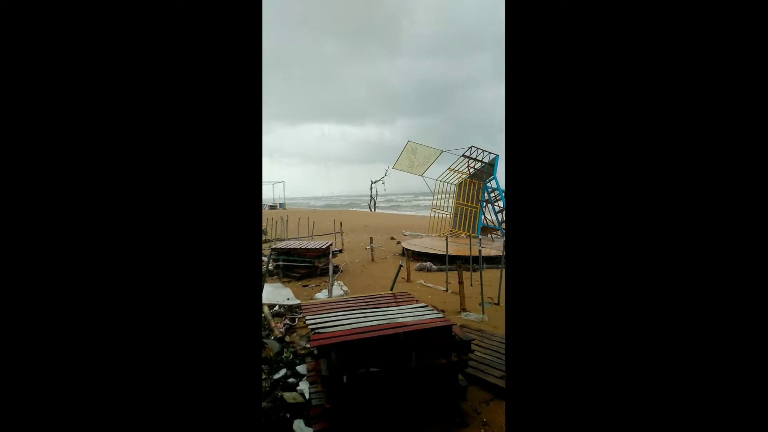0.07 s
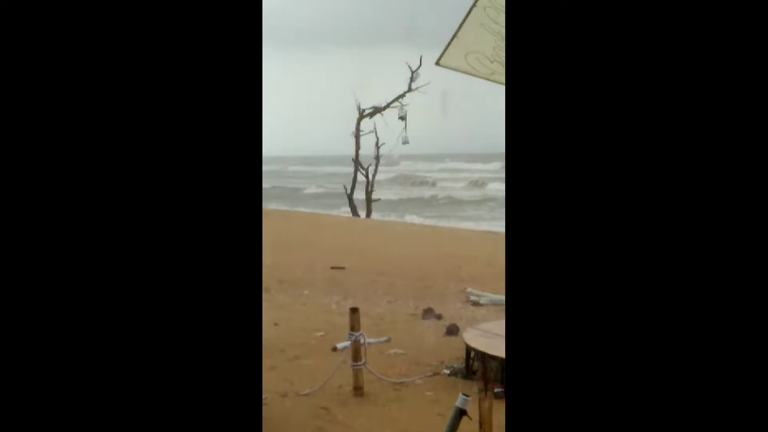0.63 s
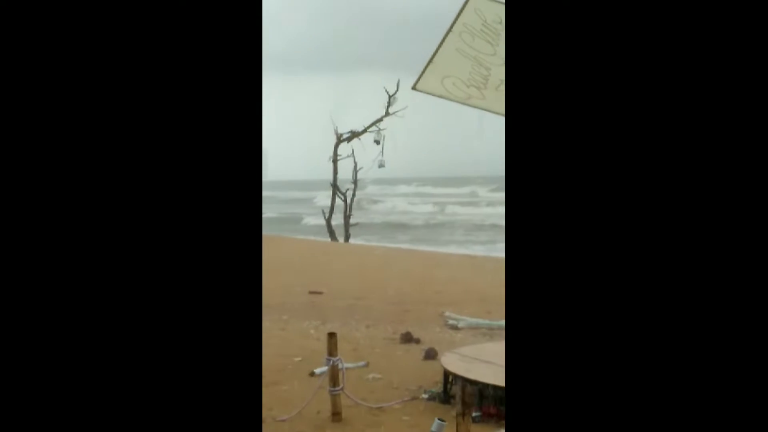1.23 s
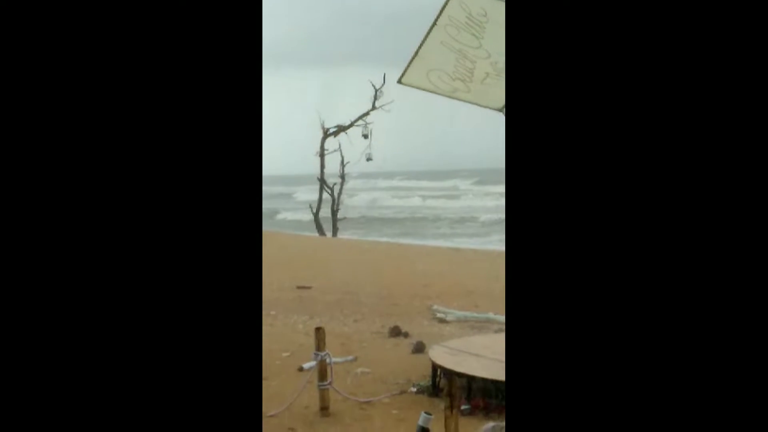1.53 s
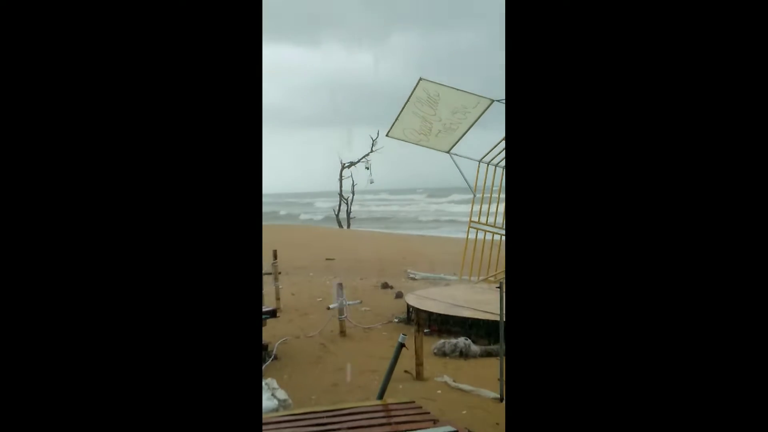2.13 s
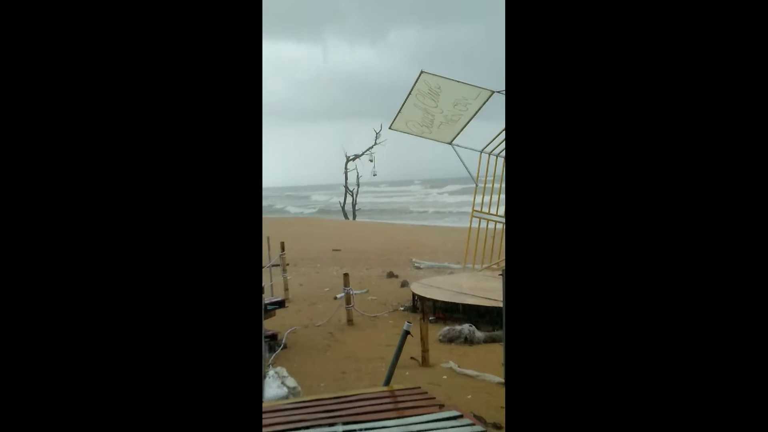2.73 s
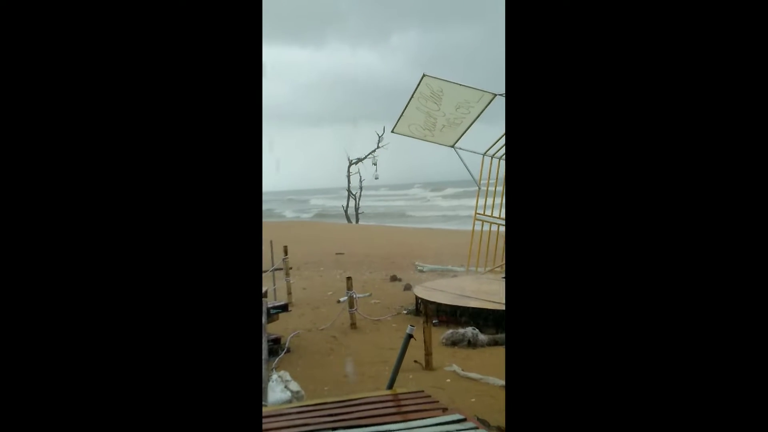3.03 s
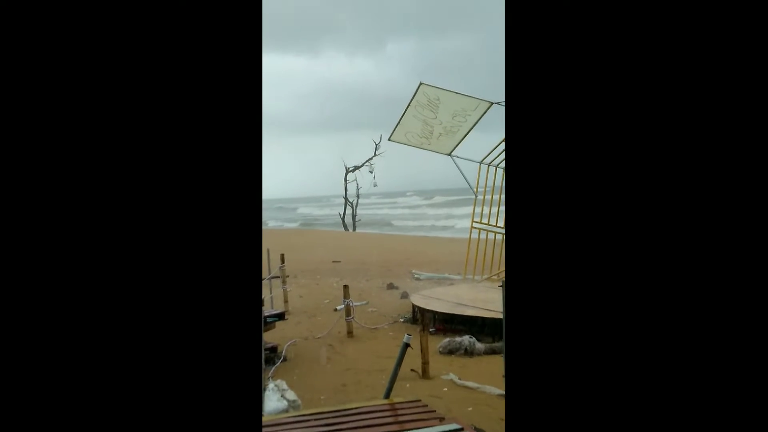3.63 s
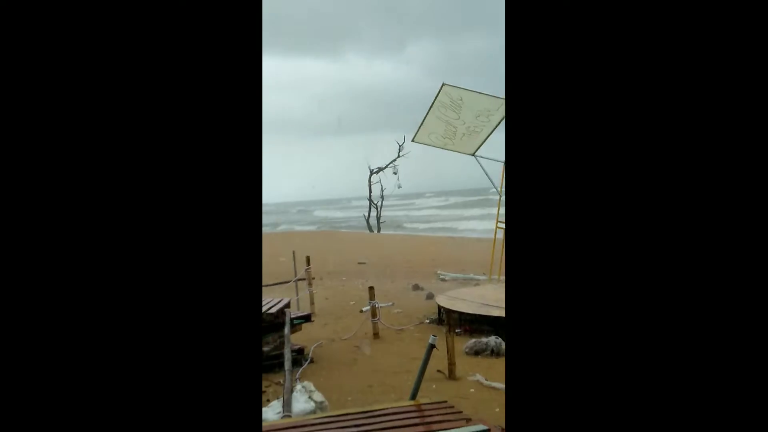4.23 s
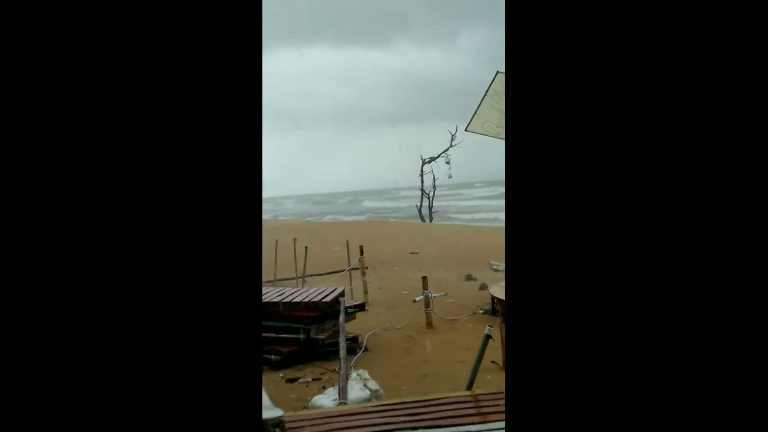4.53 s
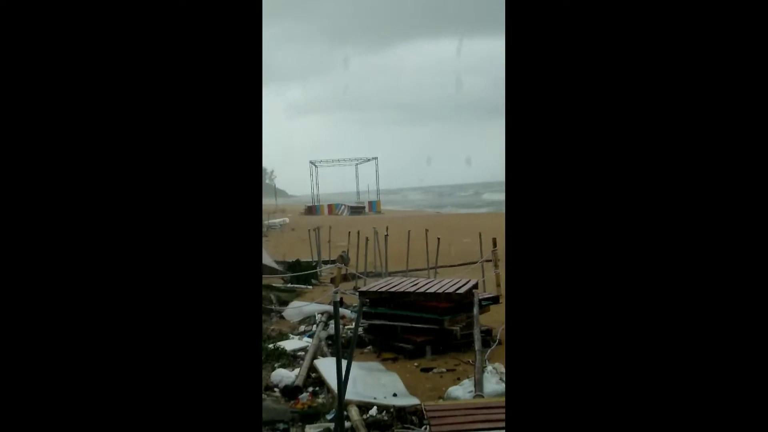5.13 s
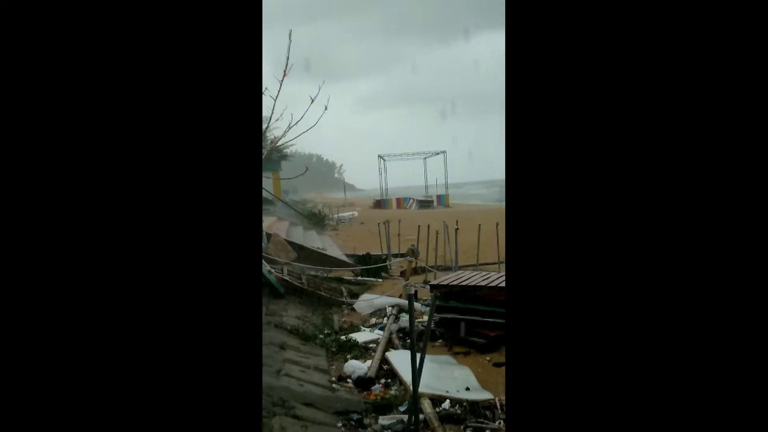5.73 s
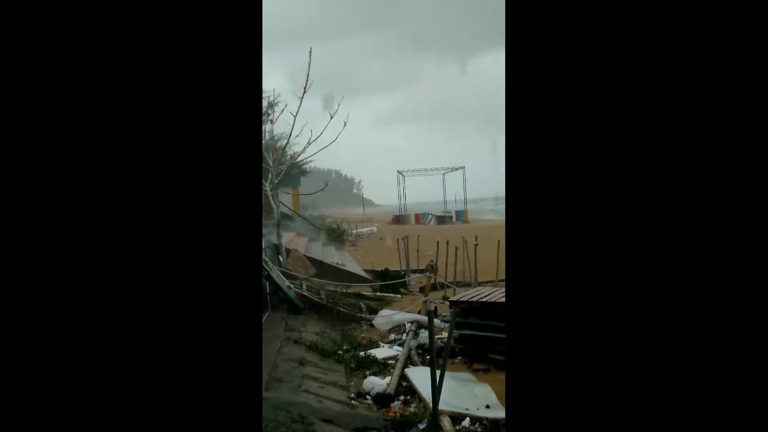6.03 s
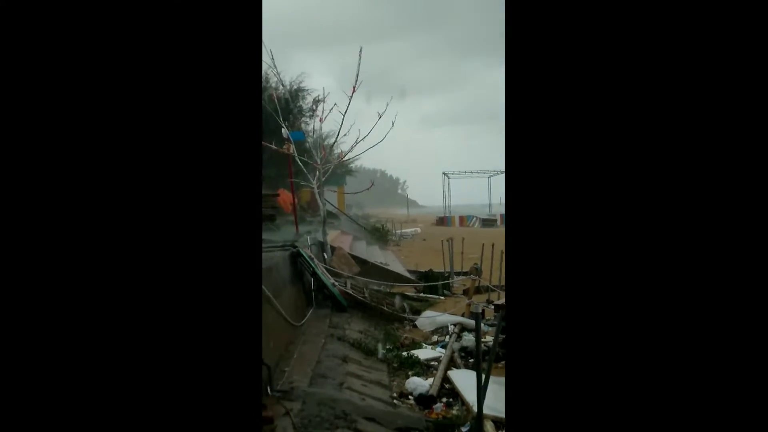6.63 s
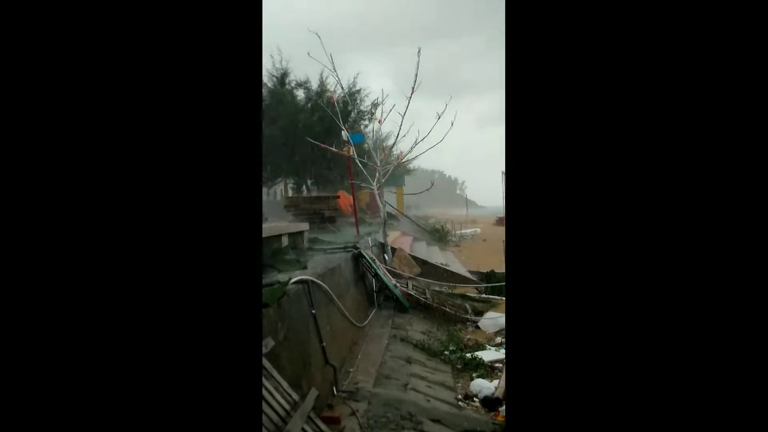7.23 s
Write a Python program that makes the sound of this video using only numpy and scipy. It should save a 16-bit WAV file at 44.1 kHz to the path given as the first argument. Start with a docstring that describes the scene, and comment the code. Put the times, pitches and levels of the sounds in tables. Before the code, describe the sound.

Loud, steady roar of storm wind and surf with hissing torrential rain and a few sharp drops close by.

```python
"""A loud, steady roar over a low rumble: wind and surf in a storm on a sandy beach, heard from a shelter.
Both are turbulent flows, which radiate broadband noise that swells with each gust. Above them
torrential rain hisses, the sum of countless impacts, with a fine patter and now and then a sharp
drop close by. The small microphone is mono, and the roar overloads it on every high crest."""
import sys
import numpy as np
from scipy import signal
from scipy.fft import rfft, irfft
from scipy.io import wavfile
from scipy.ndimage import uniform_filter1d

SR = 44100
rng = np.random.default_rng(int(sys.argv[2]) if len(sys.argv) > 2 else 0)


def pcm_store(signal):
    """Save signal as 16-bit PCM."""
    levels = np.round(np.clip(np.atleast_2d(signal), -1, 1) * 32767)
    wavfile.write(sys.argv[1], SR, levels.astype(np.int16).T)


N = 329427

# Noise spectra of surf and gale, wind round the shelter and far rain: (frequency [Hz], density [dB])
ROAR_SPECTRUM = [(150, -41), (270, -13.5), (430, -6), (600, -5.5), (830, 0.0), (980, -0.55), (1100, -2),
                 (1650, -3), (2040, -5.5), (2180, -4), (2830, -7.5), (3250, -14.5), (4500, -23),
                 (6500, -57)]
RUMBLE_SPECTRUM = [(15, -32), (25, -10), (150, 0.5), (194, 1), (260, -8), (340, -37), (570, -120)]
RAIN_SPECTRUM = [(2800, -42), (4500, -7), (5200, -5.5), (6700, -3.5), (7600, 0), (8100, -1.5), (9300, -8.3),
                 (12700, -13.7), (14200, -11.2), (15400, -7)]
# Close impacts: (time [s], level [dB], centre frequency [Hz], decay time [s])
CLOSE_DROPS = [(.0338, -1, 7700, .0011), (.0414, -4, 7600, .0005), (2.384, -13, 10900, .0005),
               (3.481, -14, 12500, .0006), (3.8255, -12, 8300, .0007), (3.829, -13, 10500, .0006),
               (4.3008, -13, 11000, .0005), (4.6712, -10, 7700, .0006), (5.012, -4, 8300, .0005),
               (5.8383, -10, 8400, .0005), (5.8535, -14, 14500, .004), (6.3815, -3.5, 7700, .0005),
               (6.611, -14, 11500, .0006), (7.0098, -12, 13500, .002)]
# Gusts, negative for a lull: (peak time [s], duration [s], relative strength [dB])
WIND_GUSTS = [(.43, .65, 0.9), (1.25, 1.8, .6), (2.3, 1.15, 1.2), (3.72, .8, -.5), (4.5, 1.1, 0.5),
              (5.92, 1.3, 0.84), (7.35, 0.45, .4)]
# The wind freshens and its rumble stays up: (start [s], end [s], change [dB])
RUMBLE_RISE = (3.4, 3.8, 1.4)
# The rain's hiss eases: (start [s], end [s], change [dB])
HISS_FALL = (2.9, 3.9, -1.4)
# The rain's finest fizz builds, then drops back: (time [s], level [dB])
FIZZ_LEVELS = [(0, -1.5), (2.4, -0.5), (4.3, -0.5), (5.3, -2), (7.47, -2)]


def surf_roar(body_db=-13.0, spray_db=-13.0, body_gust_share=0.75, spray_gust_share=1.15, eddy_db=.1):
    """Turbulence in breakers and gale radiates broadband noise; the bright spray swells most in gusts."""
    body, spray = split(turbulent_noise(ROAR_SPECTRUM, patchy_db=0.2), hz=1300)
    gust_db = gusts()
    body = evened(body) * gain_of(body_db + body_gust_share * gust_db + eddy_db * eddies(2, 6))
    spray = evened(spray) * gain_of(spray_db + spray_gust_share * gust_db + eddy_db * eddies(2.017, 6))
    return body + spray


def rain(level_db=-22.5, wash_db=2.5, patter_db=-14.5, fizz_hz=10000, gust_share=0.7, sheets_db=0.45):
    """Countless far impacts add incoherently to a hiss under the patter; wind drives them in sheets."""
    wash = turbulent_noise(RAIN_SPECTRUM, patchy_db=0.73, size=1024, patch_cells=28)
    hiss, fizz = split(gain_of(wash_db) * wash + gain_of(patter_db) * patter(), fizz_hz)
    fizz_db = np.interp(np.arange(N) / SR, *np.transpose(FIZZ_LEVELS))
    rainfall = hiss * gain_of(ramp(*HISS_FALL)) + fizz * gain_of(fizz_db)
    return rainfall * gain_of(level_db + gust_share * gusts() + sheets_db * eddies(3, 18))


def patter(drops_per_s=260, spread_db=0.5, low_hz=7000, high_hz=15000, decay_s=0.0004, bands=24):
    """Small drops of many pitches land nearby as a Poisson process, a few slightly louder than the rest."""
    out = np.zeros(N)
    for hz in np.geomspace(low_hz, high_hz, bands):
        landings = rng.random(N) < drops_per_s / bands / SR
        strengths = gain_of(spread_db * np.minimum(rng.exponential(1, N), 4))
        out += signal.oaconvolve(landings * strengths, drop_burst(hz, decay_s))[:N]
    return evened(out)


def close_drops(splash_db=-19, splash_decay_s=0.017):
    """Each impact beside the microphone radiates a sharp transient and throws off a faint splash."""
    out = np.zeros(N)
    for start_s, level_db, hz, decay_s in CLOSE_DROPS:
        splash = gain_of(splash_db) * drop_burst(hz, splash_decay_s, width_octaves=.45)
        impact = drop_burst(hz, decay_s)
        add(out, start_s, gain_of(level_db) * (impact + splash))
    return out


def drop_burst(hz, decay_s, width_octaves=0.27, rise_s=0.00016):
    """A bursting drop is an impulsive source: a band of noise around hz that decays exponentially."""
    t = np.arange(4096) / SR
    f = np.fft.rfftfreq(len(t), 1 / SR)
    band = np.exp(-.5 * (np.log2((f + 1) / hz) / width_octaves) ** 2)
    noise = irfft(band * np.exp(2j * np.pi * rng.random(len(f))))
    carrier = np.cos(np.angle(signal.hilbert(noise)))  # phase alone, so the amplitude is even
    envelope = np.exp(-t / decay_s) * (1 - np.exp(-t / rise_s))
    return carrier * envelope / envelope.max()


def wind_rumble(level_db=-29, gust_share=1.8, lead_s=.2, buffet_db=0.6):
    """Flow round the shelter makes low pressure fluctuations, which swell just ahead of each gust's roar."""
    swell_db = ramp(*RUMBLE_RISE) + gust_share * gusts(lead_s) + buffet_db * eddies(1, 8.2)
    return turbulent_noise(RUMBLE_SPECTRUM, patchy_db=0.35) * gain_of(level_db + swell_db)


def gusts(lead_s=0):
    """Flow noise grows with wind speed: each gust is a raised-cosine arch of level in dB."""
    t = np.arange(N) / SR + lead_s
    return sum(db * np.cos(np.pi * np.clip((t - peak_s) / duration_s, -.5, .5)) ** 2
               for peak_s, duration_s, db in WIND_GUSTS)


def eddies(low_hz, high_hz, count=24):
    """Eddies of many rates superpose in random phase to give a fluctuation of unit rms."""
    t = np.arange(N) / SR
    rates_hz = np.geomspace(low_hz, high_hz, count)
    return evened(sum(np.sin(2 * np.pi * (hz * t + rng.random())) for hz in rates_hz))


def turbulent_noise(spectrum, patchy_db, size=2048, patch_cells=20, hop=256):
    """Random sources sum to coloured Gaussian noise, with patches that come and go in time and pitch."""
    hz = np.fft.rfftfreq(size, 1 / SR)
    real, imag, patches = rng.standard_normal((3, N // hop + 9, len(hz)))
    patches = uniform_filter1d(patches, size=patch_cells, axis=0)  # smooth in time
    patches = evened(uniform_filter1d(patches, size=patch_cells, axis=1))  # and in frequency
    frames = (real + 1j * imag) * gain_of(level_at(spectrum, hz) + patchy_db * patches)
    _, noise = signal.istft(frames.T, nperseg=size, noverlap=size - hop)
    return evened(noise[:N])


def level_at(spectrum, hz):
    """Linear interpolation of a spectrum on a log-frequency axis."""
    f, db = np.transpose(spectrum)
    return np.interp(np.log(hz + 1), np.log(f + 1), db)


def ramp(start_s, end_s, change_db):
    """A gradual, lasting change of level in dB."""
    return change_db * np.clip((np.arange(N) / SR - start_s) / (end_s - start_s), 0, 1)


def split(x, hz, order=8):
    """Complementary filters give the parts of x below and above hz."""
    f = np.fft.rfftfreq(N, 1 / SR)
    low = irfft(rfft(x) / (1 + (f / hz) ** (2 * order)), N)
    return low, x - low


def add(mix, start_s, sound):
    """Superposes a sound on the mix."""
    part = mix[max(round(start_s * SR), 0):][:len(sound)]
    part += sound[:len(part)]


def gain_of(db):
    """Decibels to amplitude ratio."""
    return 10 ** (np.asarray(db) / 20)


def evened(x):
    """Scales to an rms of 1."""
    return x / np.sqrt(np.mean(x ** 2) + 1e-20)


def scene():
    """Sound pressures superpose at one microphone, which feeds both channels."""
    storm = wind_rumble() + surf_roar() + rain() + close_drops()
    return np.array([storm, storm])


def record(dry, ceiling=.71, cutoff_hz=15560):
    """Overload clips the highest crests flat; a low-pass filter then limits the bandwidth."""
    clipped = np.clip(dry, -ceiling, ceiling)
    low_pass = signal.firwin(1023, cutoff_hz, window=("kaiser", 9), fs=SR)
    return signal.oaconvolve(clipped, low_pass[None], "same")


dry = scene()
out = record(dry)
pcm_store(out)
```